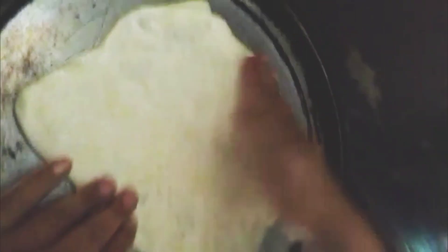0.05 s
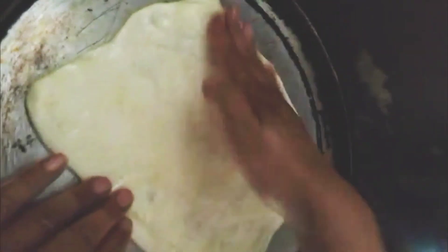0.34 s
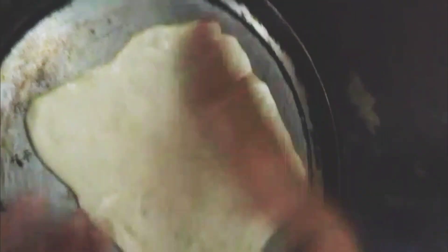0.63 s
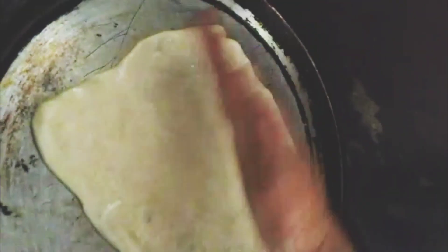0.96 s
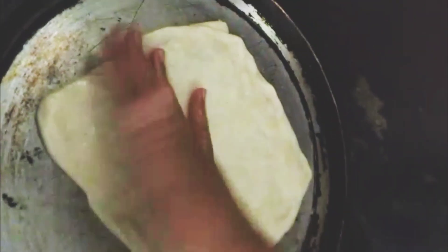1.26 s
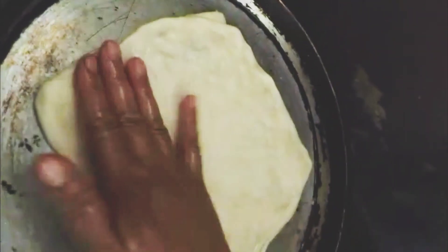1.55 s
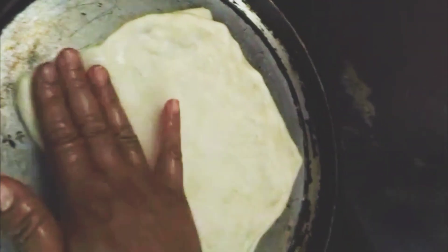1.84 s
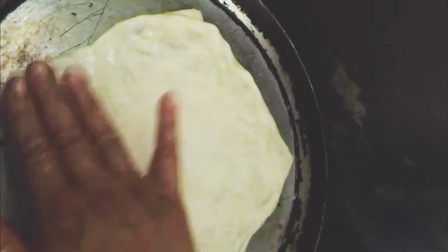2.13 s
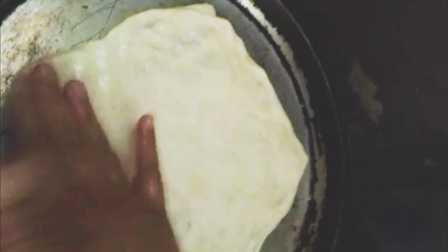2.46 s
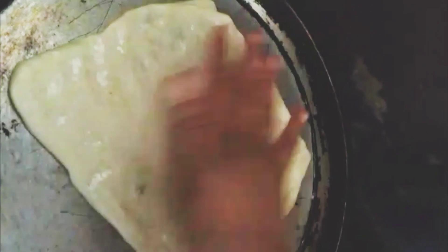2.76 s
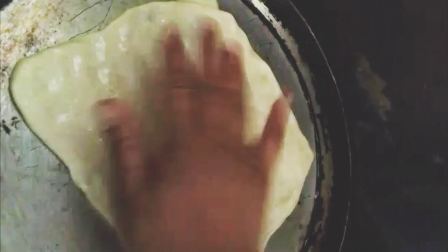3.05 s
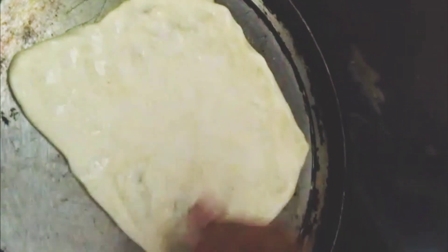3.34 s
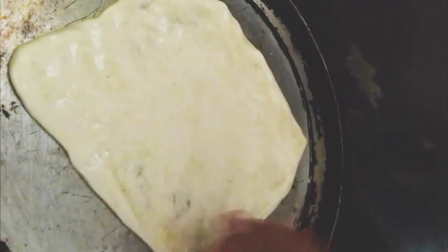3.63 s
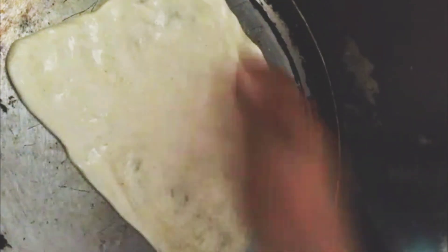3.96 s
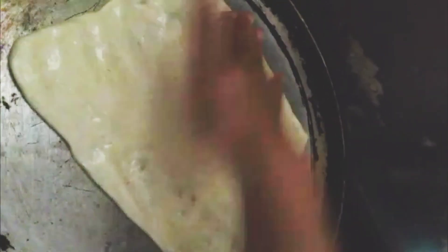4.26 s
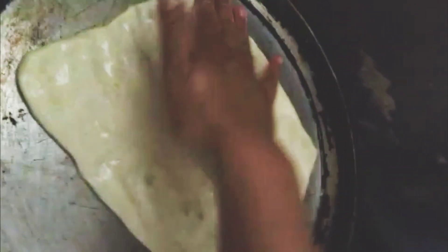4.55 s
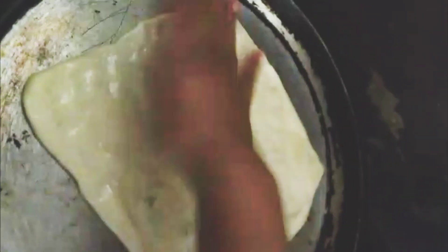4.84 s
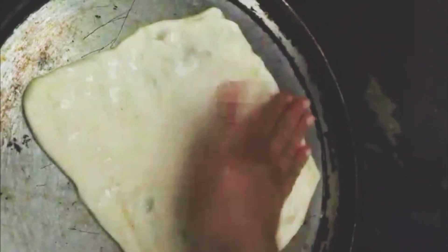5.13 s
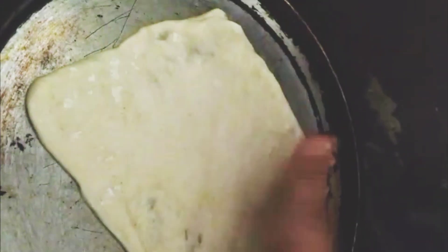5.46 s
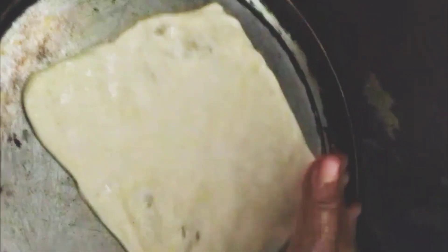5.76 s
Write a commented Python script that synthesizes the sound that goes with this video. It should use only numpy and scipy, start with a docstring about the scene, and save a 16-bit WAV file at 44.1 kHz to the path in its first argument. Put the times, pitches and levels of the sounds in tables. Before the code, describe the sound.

A hand rubs, pats and slaps oiled dough on a hot steel pan, with soft swishes and sticky ticks in a kitchen.

```python
"""A hard-walled kitchen: a hand spreads oiled dough on a hot steel pan.
The palm swishes over the dough in tiny slips, air pockets under it sing, and dragged dough rumbles.
Soft pats and two hard slaps each give a smack of air, a thud and a ring of the pan's modes.
The oil film ticks as it parts and sizzles faintly on the steel."""
import sys
import numpy as np
from scipy import signal
from scipy.fft import rfft, irfft
from scipy.io import wavfile

SR = 44100
rng = np.random.default_rng(int(sys.argv[2]) if len(sys.argv) > 2 else 0)


def generate_wav(signal):
    """Clip the signal to [-1, 1] and save it as 16-bit WAV at the path in sys.argv[1]."""
    frames = np.transpose(np.atleast_2d(signal))
    scaled = np.clip(frames, -1, 1) * 32767
    pcm = np.round(scaled).astype(np.int16)
    wavfile.write(sys.argv[1], SR, pcm)


N = 255542
TIME = np.arange(N) / SR

# Spectra of oil ticks and oil fizz. Each row: frequency in Hz, relative level in dB.
TICK_SPECTRUM = [(120, -34), (400, -16), (1000, -30), (1800, 7), (2700, 0.5), (4300, 11.5), (5300, 0.5),
                 (6500, -28), (15000, -38)]
FIZZ_SPECTRUM = [(4500, -9.5), (5800, 4), (7000, 0), (8500, -5), (11500, -8), (15000, -2)]


def amp(db):
    """Decibels to gain."""
    return 10 ** (np.asarray(db) / 20)


def unit(x):
    """Scales to rms 1."""
    return x / np.sqrt(np.mean(x ** 2) + 1e-20)


def lookup(table, hz):
    """Interpolates on a log-frequency axis."""
    table_hz, value = np.transpose(table)
    return np.interp(np.log(hz + 1), np.log(table_hz + 1), value)


def add(mix, start_s, sound):
    """Mixes a sound in at start_s."""
    part = mix[max(round(start_s * SR), 0):][:len(sound)]
    part += sound[:len(part)]


def colour(x, spectrum, size=4096):
    """Minimum-phase filter of unit energy."""
    log_gain = np.log(amp(lookup(spectrum, abs(np.fft.fftfreq(size, 1 / SR)))))
    response = np.exp(np.conj(signal.hilbert(log_gain)))
    taps = np.fft.ifft(response).real[:size // 2]
    return signal.oaconvolve(x, taps / np.linalg.norm(taps))[:len(x)]


def grains(per_s, spread_db):
    """Random impulses, most small, a few large; rms 1."""
    size = amp(spread_db * np.minimum(rng.exponential(1, N), 4))
    return unit(size * rng.choice([-1, 1], N) * (rng.random(N) < per_s / SR))


def grain_noise(spectrum, per_s, spread_db):
    """Coloured impulses, rms 1."""
    return unit(colour(grains(per_s, spread_db), spectrum))


def waver(bandwidth_hz):
    """Smooth random curve, rms 1."""
    low_pass = np.exp(-(np.fft.rfftfreq(N, 1 / SR) / bandwidth_hz) ** 2)
    return unit(irfft(rfft(rng.standard_normal(N)) * low_pass, N))


def push(start_s, swell_s, hold_s, sag_db_per_s=17.5, release_s=0.026):
    """Force of a push: swells, sags while held, lets go."""
    t = TIME - start_s
    held_s = np.maximum(t - swell_s, 0)
    release = np.exp(-np.maximum(held_s - hold_s, 0) / release_s)
    return np.clip(t / swell_s, 0, 1) ** 1.1 * amp(-sag_db_per_s * held_s) * release


def contact(rise_s, decay_s):
    """Force of a soft contact: spreads, then dies away; peak 1."""
    t = TIME[:SR // 2]
    shape = (1 - np.exp(-t / rise_s)) * np.exp(-t / decay_s)
    return shape / shape.max()


def kitchen(x, wet_db, build_s=0.0038):
    """Direct sound plus a dense tail off the walls, dying band by band."""
    # Each row: frequency in Hz, T60 in seconds.
    decay_times = [(200, 1.07), (1400, 1.056), (3700, 0.85), (6000, 0.7), (12000, 1.25)]
    hz, t, bands = signal.stft(rng.standard_normal(SR), SR, nperseg=256)
    fade = np.exp(-np.log(1000) * t / lookup(decay_times, hz)[:, None])
    tail = signal.istft(bands * fade, SR, nperseg=256)[1][:SR]
    tail *= 1 - np.exp(-(TIME[:len(tail)] / build_s) ** 2)
    return x + amp(wet_db) * signal.fftconvolve(x, tail / np.linalg.norm(tail))[:N]


def room_air(level_db=-65):
    """Quiet, steady kitchen air."""
    # Each row: frequency in Hz, relative level in dB.
    air_spectrum = [(50, -29), (100, 5), (160, -4), (250, 12.5), (600, -4), (1050, 14), (1600, -5),
                    (4200, 12), (5500, -2.5), (11000, -12), (15000, -2)]
    return amp(level_db) * unit(colour(rng.standard_normal(N), air_spectrum))


def hot_oil(sizzle_db=-68, spit_db=-76):
    """Oil sizzles and spits faintly on the steel."""
    sizzle = kitchen(grain_noise(TICK_SPECTRUM, per_s=170, spread_db=4.5), wet_db=-2.5)
    spits = kitchen(grain_noise(FIZZ_SPECTRUM, per_s=260, spread_db=4), wet_db=-4)
    return amp(sizzle_db) * unit(sizzle) + amp(spit_db) * unit(spits)


def oil_ticks(body_db=-10, snap_db=-20, body_s=0.0042, snap_s=0.0015):
    """Oily skin sticks and lets go; the film parts with a wet snap."""
    # Each row: time in seconds, relative level in dB, treble offset in dB.
    partings = [(.2656, -32, 2), (0.716, -35, -8), (1.421, -31.5, -2), (2.032, -28, -5), (2.274, -25.5, -9),
                (2.47, -28.5, -6), (2.565, -29, -11), (2.787, -36, -5), (2.806, -35, -2), (3.049, -29, 3),
                (3.0755, -23.5, -0.5), (3.2643, -37, 5), (3.629, -33.5, 2), (4.118, -25.5, -18),
                (5.4642, -23.5, -2.5)]
    body, snap = np.zeros((2, N))
    for at_s, db, treble_db in partings:
        add(body, at_s - body_s / 2, amp(db + body_db) * contact(body_s / 2, body_s))
        add(snap, at_s - snap_s, amp(db + snap_db + treble_db) * contact(snap_s / 2, snap_s))
    noise = rng.standard_normal(N)
    return kitchen(colour(body * noise, TICK_SPECTRUM) + colour(snap * noise, FIZZ_SPECTRUM), wet_db=-3.5)


def dough_drag(gain_db=-1.5):
    """Pressed dough creeps over the steel and rumbles in the pan."""
    # Each row: start, swell and hold in seconds, relative level in dB.
    drags = [(2.451, 0.047, 0.17, -54), (2.871, 0.055, 0.11, -42), (3.122, 0.052, 0.1, -56),
             (3.394, 0.044, 0.13, -56), (3.655, 0.036, 0.16, -60), (5.54, 0.028, 0.14, -57)]
    # Each row: frequency in Hz, relative level in dB.
    rumble_spectrum = [(100, -72), (170, -19.5), (215, 3), (255, 7), (310, -2.5), (400, 1), (500, -10),
                       (650, -8), (850, -10), (1300, -46.5)]
    force = sum(amp(db + gain_db) * push(*timing_s) for *timing_s, db in drags)
    return kitchen(force * grain_noise(rumble_spectrum, per_s=750, spread_db=4.5), wet_db=0)


def air_pockets(width_hz=620, octaves_per_s=3.9, gain_db=-2):
    """Air under the cupped palm sings roughly, rising in pitch as the gap shrinks."""
    # Each row: peak time and swell in seconds, resonance at the peak in Hz, relative level in dB.
    pockets = [(.4, 0.041, 2800, -55), (0.859, 0.026, 2460, -40.5), (1.32, .03, 2120, -48),
               (1.885, 0.016, 2400, -42), (2.455, 0.014, 2330, -45), (2.94, 0.027, 3200, -41),
               (3.06, 0.049, 4200, -49), (3.807, 0.021, 3950, -42.5), (4.15, 0.019, 2530, -38.5),
               (5.155, 0.024, 2650, -32.5)]
    low_cut = signal.butter(2, 1200, "high", fs=SR, output="sos")
    drive = signal.sosfilt(low_cut, grains(per_s=6200, spread_db=2.4))
    pole = np.exp(-np.pi * width_hz / SR)
    out = np.zeros(N)
    for peak_s, swell_s, hz, db in pockets:
        t = TIME - peak_s
        pitch_hz = hz * 2 ** (octaves_per_s * np.clip(t, -2 * swell_s, 2 * swell_s))
        # gliding resonance: shift down, low-pass, shift back
        carrier = np.exp(2j * np.pi * np.cumsum(pitch_hz) / SR)
        baseband = signal.lfilter([(1 - pole) ** 2], [1, -2 * pole, pole * pole], drive / carrier)
        out += amp(db + gain_db) * np.exp(-(t / swell_s) ** 2 / 2) * unit((carrier * baseband).real)
    return kitchen(out, wet_db=-10)


def pan_formants(x, top_hz, edge_hz=110, cut_db=15, gain_db=-2, depth=1.116):
    """Gives rubbing the pan's broad resonances and a moving top edge."""
    # Each row: centre in Hz, width in Hz, lift in dB before scaling by depth.
    formants = [(903, 58, 5), (1023, 81, 5), (1490, 170, 6), (2035, 31, 9), (2775, 127, 6.5),
                (3540, 88, 4.5), (4267, 140, 6), (5230, 160, 4)]
    hz, t, bands = signal.stft(x, SR, nperseg=1024, noverlap=768)
    lift_db = depth * sum(db / (1 + (2 * (hz - centre) / width) ** 2) for centre, width, db in formants)
    above = 0.5 + 0.5 * np.tanh((hz[:, None] - np.interp(t, TIME, top_hz)) / edge_hz)
    bands *= amp(lift_db[:, None] + gain_db - cut_db * above)
    return signal.istft(bands, SR, nperseg=1024, noverlap=768)[1][:N]


def palm_rub(firm_db=-42, judder_db=1.38):
    """Skin slips and judders over oiled dough; firmer strokes fizz more."""
    # Each row: start, swell and hold in seconds, relative hiss and body levels in dB, top edge in Hz.
    strokes = [(-.01, 0.0075, 0.039, -33, -47, 5700), (0.102, 0.024, 0.023, -37.5, -51.5, 5400),
               (0.215, 0.05, .4, -46.5, -60.5, 4900), (0.332, 0.022, 0.051, -43.5, -79, 5100),
               (.702, 0.019, .19, -41, -61.5, 5140), (1.104, 0.054, .035, -35, -50, 5870),
               (1.267, 0.025, 0.077, -44.5, -53.5, 5600), (1.458, 0.071, 0.087, -37.5, -49, 5680),
               (1.682, 0.026, 0.015, -42.5, -62, 5470), (1.797, 0.076, 0.063, -38.5, -51, 5600),
               (2.053, 0.058, 0.27, -45, -49.5, 5700), (2.424, 0.014, 0.15, -46.5, -49, 5700),
               (2.616, 0.013, .18, -50, -57.5, 4500), (2.867, 0.014, .21, -39.5, -44, 5560),
               (3.169, 0.026, 0.09, -49.5, -49, 5470), (3.327, 0.052, 0.033, -41, -47.5, 5300),
               (3.474, 0.023, 0.023, -43.5, -51.5, 5450), (3.68, .03, 0.093, -52.5, -67, 4600),
               (4.094, 0.023, 0.061, -37.5, -46, 6360), (5.075, 0.012, 0.068, -32, -40.5, 6400),
               (5.181, 0.029, 0.025, -37.5, -45, 7500), (5.33, 0.039, 0.034, -36.5, -45.5, 6900),
               (5.467, 0.043, 0.17, -45.5, -54, 6250)]
    # Skin hiss and hollow body. Each row: frequency in Hz, relative level in dB.
    hiss_spectrum = [(600, -49.5), (1300, -33), (1900, -14), (2500, -6), (3200, -2.5), (3900, 2),
                     (4450, 2.5), (4800, -4), (5500, -7), (6300, -9), (7600, -23), (9000, -58.5)]
    body_spectrum = [(150, -48), (300, -4.5), (650, -5.5), (850, -1.5), (1150, 6.5), (1400, -0.5),
                     (1750, -5.5), (2300, 1), (3500, -29.5)]
    start_s, swell_s, hold_s, hiss_db, body_db, top_hz = np.transpose(strokes)
    power = np.array([push(*timing_s) for timing_s in zip(start_s, swell_s, hold_s)]) ** 2

    def envelope(db):
        return np.sqrt(amp(db) ** 2 @ power)

    hiss = envelope(hiss_db - 1.5) * grain_noise(hiss_spectrum, per_s=4200, spread_db=2.7)
    body = envelope(body_db - 6) * grain_noise(body_spectrum, per_s=2800, spread_db=2.8)
    fizz_db = -63.5 + 0.92 * (hiss_db - firm_db)
    fizz = envelope(fizz_db) * grain_noise(FIZZ_SPECTRUM, per_s=3200, spread_db=3.5)
    moving_top_hz = np.interp(TIME, start_s + swell_s + hold_s / 2, top_hz)
    judder = amp(judder_db * waver(bandwidth_hz=43))
    return kitchen((pan_formants(hiss + body, moving_top_hz) + fizz) * judder, wet_db=0.5)


def pan_ring(rim_db, lowest_t60_s, rim_hz=2090, rise_s=0.0018):
    """Steel pan modes, higher ones shorter; a blow near the edge brings out the rim's bell note."""
    # Each row: frequency in Hz, relative level in dB.
    pan_modes = [(217, -3.5), (250, -2.5), (260, 14.5), (334, -10), (431, 7.5), (443, -35), (552, 2),
                 (645, 7.5), (816, 4), (842, 5), (1142, 2), (1173, -1), (1675, 0.5), (2083, 1), (2108, -9),
                 (2643, -3), (2854, 1), (3602, -30), (3872, -14), (4263, -12), (4380, -8), (4582, -25),
                 (5276, -40), (5862, -59)]
    t = TIME[:SR * 3 // 2]
    hz, db = np.transpose(pan_modes)[:, :, None]
    level = amp(db + rim_db * np.exp(-((hz - rim_hz) / 210) ** 2))
    fade = np.exp(-np.log(1000) * t / lowest_t60_s * (hz / hz[0]) ** 0.045)
    modes = level * fade * np.sin(2 * np.pi * (hz * t + rng.random(hz.shape)))
    low_cut = signal.butter(6, 185, "high", fs=SR, output="sos")
    return signal.sosfilt(low_cut, modes.sum(0) * (1 - np.exp(-t / rise_s)))


def slaps(squelch_s=0.017, free_t60_s=0.71, pressed_t60_s=0.22, bounce_db=-40):
    """Air squirts from under the hand in a smack; flesh thuds, the pan rings, squeezed oil crackles."""
    # Each row: start in seconds, relative smack and thud levels in dB, smack decay in seconds,
    # rim and oil offsets in dB.
    blows = [(1.4, -61, -58.5, 0.0037, -13, 4), (1.983, -36.5, -34.5, 0.025, 14.5, -3),
             (2.062, -36, -45.5, 0.0074, -5, -8), (2.262, -44, -34.5, 0.018, -11, -5),
             (3.401, -42, -48.5, .014, -12, -10), (4.3114, -15, -23.5, 0.013, 3, -8),
             (4.399, -28, -26.5, 0.022, 1, 2), (4.649, -13.5, -21.5, 0.012, 14.5, -4),
             (4.691, -27, -32.5, 0.038, -11, 9), (4.737, -25, -26.5, .009, 0, 10),
             (4.84, -20.5, -28, 0.0086, -15, -6), (4.937, -57, -38.5, 0.03, -23.5, -10),
             (4.974, -34.5, -42, .0055, -12, -10), (5.05, -35, -52, 0.0068, -7.5, -6)]
    # Each row: frequency in Hz, relative level in dB.
    smack_spectrum = [(300, -34.5), (900, -1.5), (1600, -5.5), (2100, -4.5), (2900, -7), (3600, 2),
                      (4400, 3), (5300, -2), (6100, -13.5), (7200, -24.5), (9000, -30), (12000, -39),
                      (15000, -39)]
    thud_spectrum = [(40, -46.5), (150, -50.5), (182, -24), (212, 4.5), (260, 1.5), (310, -2), (430, 5),
                     (510, -7.5), (650, -4), (840, -8), (1000, -16.5), (1600, -11.5), (2600, -28),
                     (5000, -64)]
    squelch_spectrum = [(2000, -41), (6300, 19.5), (8500, -18), (11500, -24), (15000, 10)]
    smack, thud, ring, squelch = np.zeros((4, N))
    for start_s, smack_db, thud_db, decay_s, rim_db, oil_db in blows:
        rise_s, ring_db = 0.17 * decay_s, smack_db - 19.5
        add(smack, start_s, amp(smack_db) * contact(rise_s, decay_s))
        add(thud, start_s, amp(thud_db) * contact(2.25 * rise_s, 2.4 * decay_s))
        # a hard slap bounces off; a soft one stays and damps the steel
        t60_s = free_t60_s if ring_db > bounce_db else pressed_t60_s
        add(ring, start_s, amp(ring_db) * pan_ring(rim_db, t60_s))
        add(squelch, start_s, amp(smack_db - 33 + oil_db) * contact(squelch_s / 2, squelch_s))
    crackle = grains(per_s=450, spread_db=3) * amp(4.5 * waver(bandwidth_hz=30))
    squelch = colour(squelch * crackle, squelch_spectrum)
    smack = colour(smack * grains(per_s=14000, spread_db=0.13), smack_spectrum)
    thud = colour(thud * grains(per_s=6500, spread_db=1), thud_spectrum)
    return kitchen(smack + squelch, wet_db=-2.5) + kitchen(thud, wet_db=-4.5) + ring


def scene():
    """All sources, close and mono."""
    return (palm_rub() + air_pockets() + dough_drag() + slaps() + oil_ticks() + room_air() + hot_oil())[None]


def record(dry, cutoff_hz=15650):
    """Steep low-pass."""
    taps = signal.firwin(511, cutoff_hz, window=("kaiser", 9), fs=SR)
    return signal.oaconvolve(dry, taps[None], "same")


dry = scene()
out = record(dry)
generate_wav(out)
```